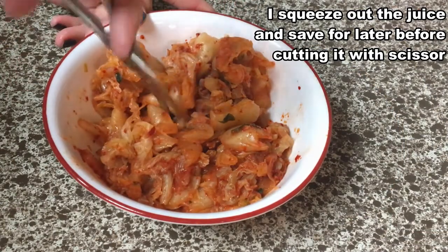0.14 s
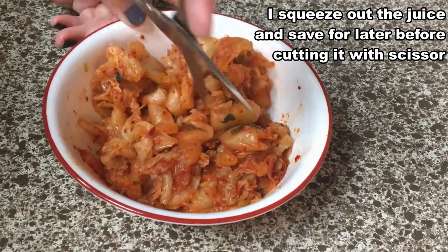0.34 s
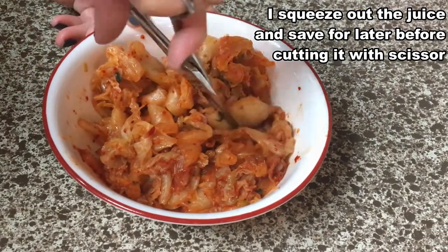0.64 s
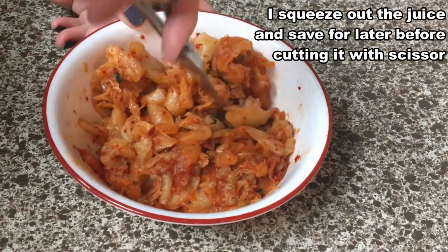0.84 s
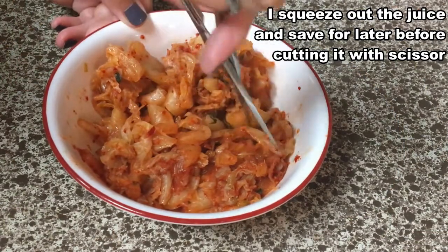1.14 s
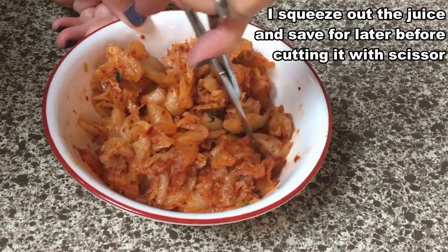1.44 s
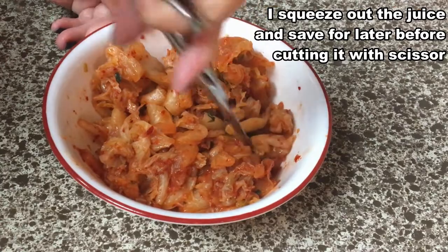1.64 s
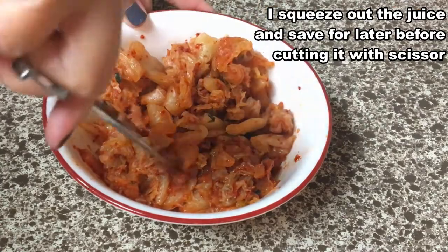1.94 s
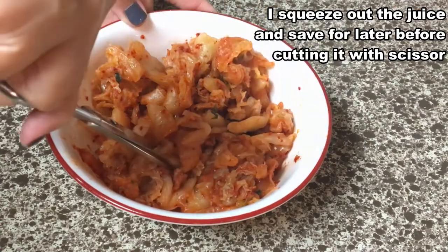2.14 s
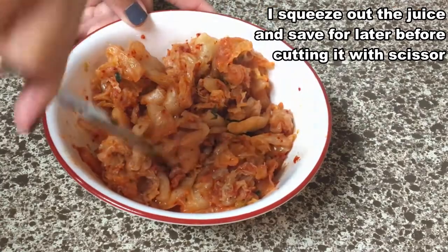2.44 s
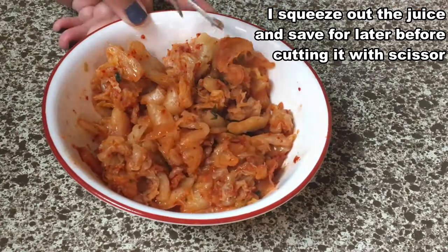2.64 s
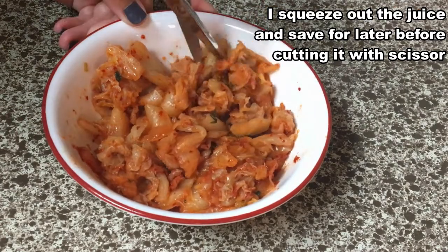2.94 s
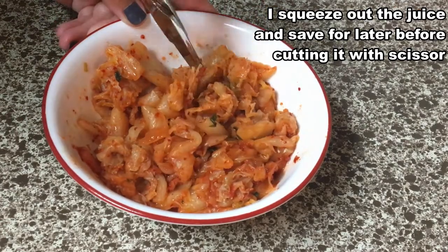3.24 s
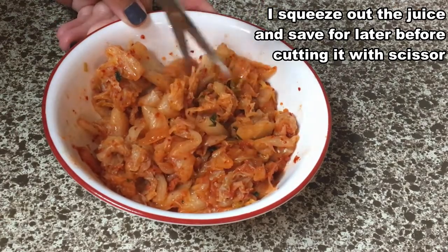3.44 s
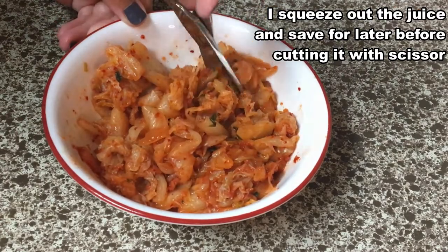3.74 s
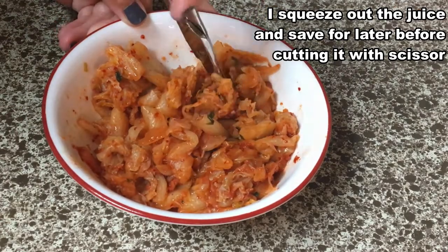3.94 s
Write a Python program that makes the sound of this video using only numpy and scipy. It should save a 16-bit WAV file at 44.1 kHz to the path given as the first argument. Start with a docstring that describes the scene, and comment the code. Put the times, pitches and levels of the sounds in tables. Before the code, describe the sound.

Close by in a small kitchen, steel scissors snap shut six times, a little under a second apart, shearing through juicy kimchi. Soft crunches and small squelches lead into the sharp metallic clicks, mixed with dull knocks and clacks of the tips against the bowl. Between cuts the wet blades slide quietly open and the brine faintly fizzes, while an appliance and its fan hum underneath.

```python
"""Kitchen scissors snip six times through wet kimchi in a bowl on a stone counter.
Each cut crunches through the cabbage, then the steel blades clash shut and ring.
Their tips knock the bowl, wet steel swishes as they open, ribs snap and brine fizzes.
A small kitchen reverberates, and an appliance hums over the rush of its fan."""
import sys
import numpy as np
from scipy import signal
from scipy.fft import rfft, irfft, next_fast_len
from scipy.io import wavfile
from scipy.ndimage import map_coordinates

SR = 44100
rng = np.random.default_rng(int(sys.argv[2]) if len(sys.argv) > 2 else 0)


def master(y):
    """Save y as 16-bit WAV."""
    cut = np.clip(np.atleast_2d(y).T, -1, 1)
    pcm = np.round(cut * 32767)  # scale
    wavfile.write(sys.argv[1], SR, pcm.astype(np.int16))


N = 180587
TOP_HZ = 15900
HIT_SAMPLES, LEAD_SAMPLES = 8192, 1300  # buffer of one hit; part before its peak
HIT_S = (np.arange(HIT_SAMPLES) - LEAD_SAMPLES) / SR
HIT_HZ = np.fft.rfftfreq(HIT_SAMPLES, 1 / SR)

# Scissor strokes. Each row: clash time in seconds, level in dB, ring offset in dB, treble offset in dB,
# fall in seconds, gather and bite durations before the clash in seconds, crunch level in dB.
STROKES = [(0.016, -14, -0.5, -1.5, 0.041, 0.025, 0.035, -45.5),
           (0.7514, -14, -10.5, -4, 0.031, .28, 0.16, -49), (1.576, -15.5, -2, -3, 0.044, .33, 0.054, -41),
           (2.3280, -16, 5.5, -2, 0.028, 0.34, 0.12, -52), (3.242, -11, 3, -2.5, 0.037, .35, 0.13, -48),
           (3.968, -18.5, 2.5, 1.5, 0.037, 0.29, 0.083, -52)]
# Blade modes. Each row: frequency in Hz, width in Hz, relative level in dB.
BLADE_MODES = [(2006, 42, -16), (3460, 70, -22), (3995, 64, -7.5), (4550, 83, -11.5), (5270, 85, -20),
               (5580, 110, -4.5), (6850, 170, 6), (7300, 580, 0.5), (7800, 300, -20.5), (11500, 540, -8),
               (12650, 260, -12), (13100, 210, -25.5), (14930, 93, -16.5)]
# Rasp of edge on edge. Each row: frequency in Hz, relative density in dB.
RASP_SPECTRUM = [(200, -8), (1000, -20), (2000, -11.5), (3000, -4), (3600, -8), (4700, -2.5), (6200, -4.5),
                 (7800, -2), (9400, -7), (11000, -6.5), (13300, 5.5), (15500, -5.5), (17000, -10)]
def blade_clashes(rise_s=0.017, contact_db=-3, ring_db=-4, treble_hz=10000, rattle_db=-21, rattle_s=0.2):
    """The edges chatter past each other, set the blades ringing and rattle to rest."""
    out = np.zeros(N)
    steel = resonances(BLADE_MODES, HIT_HZ)
    rasp = amp(log_interp(RASP_SPECTRUM, HIT_HZ))
    treble = 1 / (1 + (treble_hz / (HIT_HZ + 1)) ** 10)
    for clash_s, level_db, ring_offset_db, treble_db, fall_s, *_ in STROKES:
        rattle = amp(rattle_db) * burst(rise_s, rattle_s)
        force = amp(level_db) * np.maximum(burst(rise_s, fall_s), rattle)
        contact = struck(force, rasp * amp(treble_db * treble), hard_stop=0.047)
        ring = struck(force, steel, hard_stop=0.52)
        add_hit(out, clash_s, amp(contact_db) * contact + amp(ring_db + ring_offset_db) * ring)
    return out


def stroke_pressure(gather_db=-66, grip_s=0.0084, squeeze_db=8):
    """Each stroke gathers the leaves lightly, then bites ever harder until the blades meet."""
    t, pressure = np.arange(N) / SR, np.zeros(N)
    for clash_s, *_, gather_s, bite_s, crunch_db in STROKES:
        left_s = clash_s - t
        gather = np.clip((gather_s - left_s) / grip_s, 0, 1) * (left_s > 0)
        bite = np.clip((bite_s - left_s) / grip_s, 0, 1) * (left_s > 0)
        gap = np.clip(left_s / bite_s, 0, 1)
        pressure += amp(gather_db) * gather + amp(crunch_db - squeeze_db * gap) * bite
    return pressure


# Tearing cabbage. Each row: frequency in Hz, relative density in dB.
CABBAGE_SPECTRUM = [(200, -9.5), (900, 1.5), (2000, 6), (3600, 3.5), (5500, -9), (7000, -0.5), (8500, -1.5),
                    (10300, -4.5), (12000, -1), (16000, -16.5)]
def cabbage_crunch(shear_db=-6, cell_db=-4.5, fibre_db=-8, clump_db=3.0):
    """Cells burst in clumps and thin fibres tick while the blades shear the wet leaves."""
    pressure = stroke_pressure()
    clumps = unit_rms(amp(clump_db * wobble(70)))
    shear = coloured(pressure * clumps * rng.standard_normal(N), CABBAGE_SPECTRUM)
    cells = crackle(pressure * clumps, per_s=1500, pitch_hz=5590, octaves=1.2, cycles=8.3, spread_db=10)
    fibres = crackle(pressure, per_s=100, pitch_hz=6500, octaves=0.8, cycles=3, spread_db=14)
    return amp(cell_db) * cells + amp(shear_db) * shear + amp(fibre_db) * fibres


# Tips on the bowl. Each row: time in seconds, thud level in dB, clack level in dB,
# clack pitch in Hz, clack spread in octaves.
TIP_KNOCKS = [(0.011, -36.5, -42, 2400, 0.83), (0.334, -54, -49.5, 1200, .7),
              (0.572, -63.5, -44.5, 2240, 1), (0.599, -32.5, -31, 520, 0.47), (0.678, -39, -50, 2600, 0.64),
              (0.772, -33.5, -31.5, 555, 1.9), (1.587, -29, -19.5, 1160, 0.71),
              (2.089, -39.5, -44, 2800, 0.98), (2.327, -43, -40, 1900, 0.5),
              (3.208, -38, -42.5, 1900, 0.64), (3.238, -36, -30, 2300, 0.46), (3.256, -27.5, -25, 800, 1),
              (3.736, -39.5, -43, 2100, 0.61), (3.967, -34.5, -16, 1960, 0.33),
              (3.969, -23.5, -18, 1200, 0.49)]
# Low modes of bowl and counter. Each row: frequency in Hz, relative level in dB, T60 in seconds.
THUD_MODES = [(53.7, -4, 0.16), (86, -8.5, 0.15), (130.1, -1.5, 0.11), (189, 7, 0.054), (245.8, 1.5, 0.06),
              (327, -4.5, 0.072), (510, -11, 0.062)]
# Bowl wall damped by food. Each row: frequency in Hz, width in Hz, relative level in dB.
BOWL_MODES = [(290, 160, 2), (566, 130, 0), (800, 190, -8), (1200, 177, -1), (1410, 410, -4),
              (1565, 92, -1), (1922, 70, -3.5), (2180, 100, -5), (2470, 600, -13)]
def bowl_knocks(rise_s=0.039, fall_s=0.022, attack_s=0.0008, clack_lag_s=0.0035):
    """The tips hit the bowl through the food: a dull thud, and a clack pitched by the contact."""
    out, t = np.zeros(N), np.maximum(HIT_S, 0)
    wall = resonances(BOWL_MODES, HIT_HZ)
    for time_s, thud_db, clack_db, pitch_hz, octaves in TIP_KNOCKS:
        thud = np.zeros(HIT_SAMPLES)
        for k, (hz, db, t60_s) in enumerate(THUD_MODES):
            envelope = amp(db + rng.normal(0, 1) - 60 * t / t60_s)
            thud += (-1) ** k * envelope * np.sin(2 * np.pi * hz * rng.normal(1, 0.05) * t)
        add_hit(out, time_s, amp(thud_db) * thud * (1 - np.exp(-t / attack_s)))
        force = amp(clack_db) * burst(rise_s, fall_s)
        clack = struck(force, wall * band(pitch_hz, octaves), hard_stop=0.33)
        add_hit(out, time_s + clack_lag_s, clack)
    return out


# Ribs and juice films. Each row: peak time in seconds, level in dB, pitch in Hz, fall in seconds.
WET_SNAPS = [(0.229, -48, 7500, 0.031), (0.599, -45, 8700, 0.1), (0.681, -41, 6780, 0.065),
             (1.328, -48, 3700, 0.031), (1.497, -47, 3820, 0.045), (1.542, -42, 3740, 0.031),
             (2.005, -52.5, 4160, 0.041), (2.076, -51, 3000, 0.032), (2.098, -42, 6200, 0.024),
             (2.292, -47.5, 8200, 0.071), (2.483, -47, 6970, .025), (2.903, -52.5, 7440, .035),
             (2.974, -50.5, 7900, 0.019), (3.028, -53.5, 5260, .025), (3.161, -45, 7400, 0.04),
             (3.21, -47.5, 7800, .025), (3.740, -47, 4550, 0.029), (3.762, -46, 3460, .04),
             (3.799, -47.5, 6400, 0.033)]
def wet_snaps(rise_ratio=0.44, octaves=0.12):
    """A cabbage rib or a film of juice gives way in a short pitched squelch."""
    out = np.zeros(N)
    cabbage = amp(log_interp(CABBAGE_SPECTRUM, HIT_HZ))
    for peak_s, db, pitch_hz, fall_s in WET_SNAPS:
        cavity = np.sqrt(band(pitch_hz, octaves)) * cabbage
        force = amp(db) * burst(rise_ratio * fall_s, fall_s)
        add_hit(out, peak_s, struck(force, cavity, hard_stop=0.17))
    return out


# Blades spreading. Each row: start in seconds, level in dB.
BLADE_OPENINGS = [(0.145, -58), (0.888, -55.5), (1.711, -56), (2.465, -55), (2.794, -61), (3.399, -54)]
# Sliding steel. Each row: frequency in Hz, relative density in dB.
SLIDE_SPECTRUM = [(500, -31), (2500, -0.5), (4500, -8), (7000, 1), (8500, 1), (10500, -25), (12500, 4.5),
                  (16000, -54)]
def blade_openings(length_s=0.039, squeak_hz=9500, squeak_db=-1, film_db=-4, slide_db=-3):
    """Wet steel slides on steel as the blades spread, with a faint squeak late in the travel."""
    t = np.arange(N) / SR
    speed, squeak_level = np.zeros((2, N))
    for start_s, db in BLADE_OPENINGS:
        moving = (t > start_s) & (t < start_s + length_s)
        travel = (t[moving] - start_s) / length_s
        speed[moving] = amp(db) * np.sqrt(abs(np.sin(np.pi * travel)))
        squeak_level[moving] = speed[moving] * travel
    friction = squeak_level * rng.standard_normal(N)
    squeak = filtered(friction, lambda hz: resonances([(squeak_hz, 250, 0)], hz))
    film = crackle(speed, per_s=1400, pitch_hz=7430, octaves=1.19, cycles=12, spread_db=21)
    slide = coloured(speed * rng.standard_normal(N), SLIDE_SPECTRUM)
    return amp(slide_db) * slide + amp(film_db) * film + amp(squeak_db) * squeak


def brine_fizz(level_db=-79, sway_db=4):
    """Tiny bubbles fizz in patches in the stirred brine."""
    level = amp(level_db + sway_db * wobble(16))
    return crackle(level, per_s=550, pitch_hz=7500, octaves=0.96, cycles=5.1, spread_db=12)


# Room decay. Each row: frequency in Hz, T60 in seconds.
ROOM_T60 = [(100, 0.95), (500, 0.19), (1500, 0.33), (4000, 0.24), (7000, 0.27), (10000, 0.17),
            (15000, 0.24)]
# Wall reflections. Each row: frequency in Hz, gain in dB.
WALL_GAIN = [(100, -3), (400, -5), (750, 9.5), (1200, -3), (2000, -3), (3000, 2), (5100, -0.5),
             (6000, -0.5), (6950, -4.5), (8500, -1.5), (12500, -4), (15000, -16)]
def kitchen_reverb(x, build_s=0.0036):
    """Wall reflections build into a diffuse tail; each frequency dies at its own rate."""
    bins_hz, frames_s, noise = signal.stft(rng.standard_normal(SR // 2), SR, nperseg=256)
    decay = amp(-60 * frames_s / log_interp(ROOM_T60, bins_hz)[:, None])
    tail = signal.istft(noise * decay, SR, nperseg=256)[1]
    t = np.arange(len(tail)) / SR
    tail *= 1 - np.exp(-(t / build_s) ** 2)
    reverb = signal.fftconvolve(x, tail / np.linalg.norm(tail))[:N]
    return filtered(reverb, lambda hz: amp(log_interp(WALL_GAIN, hz)))


# Appliance hum. Each row: frequency in Hz, relative level in dB.
HUM_TONES = [(59.2, -54.5), (118.4, -47.5), (188.4, -53)]
# Fan rush. Each row: frequency in Hz, relative density in dB.
FAN_SPECTRUM = [(12, -51), (20, -20.5), (60, -11.5), (86, -20.5), (101, -15.5), (123, -5.5), (150, -10.5),
                (187, -6), (216, -22), (241, -16.5), (377, -14), (485, -24.5), (2200, -37), (2460, -40),
                (16000, -63)]
def appliance(fan_db=-50, hum_gain_db=-2, waver_db=1.8, waver_rad=0.6):
    """An appliance hums, wavering a little, over the low rush of its fan."""
    t, hum = np.arange(N) / SR, np.zeros(N)
    for hz, db in HUM_TONES:
        level = amp(db + waver_db * wobble(9))
        hum += level * np.sin(2 * np.pi * hz * t + waver_rad * wobble(9))
    fan = unit_rms(coloured(rng.standard_normal(N), FAN_SPECTRUM))
    return amp(hum_gain_db) * hum + amp(fan_db) * fan


def struck(force, response, hard_stop):
    """A body driven by chattering contact and one impulse; it keeps the energy of the force."""
    strength = np.linalg.norm(force)
    drive = force * rng.standard_normal(HIT_SAMPLES) + hard_stop * strength * (HIT_S == 0)
    sound = irfft(rfft(drive) * response)
    return sound * strength / np.linalg.norm(sound)


def burst(rise_s, fall_s):
    """Hit envelope, 60 dB down at rise_s before its peak and fall_s after."""
    return amp(-60 * np.maximum(-HIT_S / rise_s, HIT_S / fall_s))


def add_hit(out, peak_s, hit):
    """Mix a hit into out with its peak at peak_s."""
    at = round(peak_s * SR) - LEAD_SAMPLES + np.arange(HIT_SAMPLES)
    inside = (at >= 0) & (at < N)
    out[at[inside]] += hit[inside]


def crackle(level, per_s, pitch_hz, octaves, cycles, spread_db):
    """A shower of pops of random pitch and size whose rms follows level."""
    when, pitch_draw, size_draw = rng.random((int(per_s * N / SR), 3)).T
    hz = pitch_hz * 2 ** (octaves * (2 * np.sqrt(pitch_draw) - 1))
    size = amp(spread_db * size_draw ** 2)
    shower_rms = np.sqrt(per_s * np.mean(size ** 2 * cycles / hz / 4))
    size *= level[(when * N).astype(int)] / shower_rms
    audible = size > 1e-5
    return pops(when[audible] * N / SR, size[audible], hz[audible], cycles)


def pops(starts_s, sizes, hz, cycles):
    """Tiny wet pops: sines that fall to 1/e in the given cycles."""
    t = np.arange(SR // 200) / SR
    hz = np.clip(hz, 800, TOP_HZ)[:, None]
    waves = sizes[:, None] * np.sin(2 * np.pi * hz * t) * np.exp(-hz * t / cycles)
    at = np.clip(np.round(starts_s * SR).astype(int), 0, N)[:, None] + np.arange(len(t))
    return np.bincount(at.ravel(), waves.ravel(), N)[:N]


def resonances(modes, hz):
    """Causal response of modes of alternating sign, with unit mean power."""
    response = sum((-1) ** k * amp(db) * 1j * hz * width / (centre ** 2 - hz ** 2 + 1j * hz * width)
                   for k, (centre, width, db) in enumerate(modes))
    return response / np.sqrt(np.mean(abs(response) ** 2))


def band(centre_hz, octaves):
    """Bell over HIT_HZ, halved at octaves either side of the centre."""
    return 1 / (1 + (np.log2((HIT_HZ + 1) / centre_hz) / octaves) ** 2)


def filtered(x, response):
    """Apply a complex frequency response to x."""
    size = next_fast_len(len(x) + HIT_SAMPLES)
    return irfft(rfft(x, size) * response(np.fft.rfftfreq(size, 1 / SR)), size)[:len(x)]


def coloured(x, spectrum):
    """Shape x by a spectrum, keeping the power of white input."""
    return filtered(x, lambda hz: unit_rms(amp(log_interp(spectrum, hz))))


def log_interp(points, hz):
    """Interpolate (Hz, value) points on a log frequency axis."""
    knots_hz, values = np.transpose(points)
    return np.interp(np.log(hz + 1), np.log(knots_hz + 1), values)


def wobble(knots_per_s):
    """Smooth random curve."""
    knots = rng.standard_normal(int(N * knots_per_s / SR) + 4)
    return map_coordinates(knots, [np.arange(N) * knots_per_s / SR])


def amp(db):
    """Decibels to gain."""
    return 10 ** (np.asarray(db) / 20)


def unit_rms(x):
    """Scale to rms 1."""
    return x / np.sqrt(np.mean(x ** 2) + 1e-20)


def scene():
    """Scissors, food and bowl close by in mono; the bowl has its own reverb tail."""
    clashes = blade_clashes()
    wet_sounds = cabbage_crunch() + wet_snaps() + blade_openings() + brine_fizz()
    knocks = bowl_knocks()
    room = kitchen_reverb(amp(-12.5) * clashes + amp(-10) * wet_sounds)
    room += kitchen_reverb(amp(-11) * knocks)
    return (clashes + wet_sounds + knocks + room + appliance())[None]


def record(dry):
    """Steep low-pass at TOP_HZ."""
    return filtered(dry[0], lambda hz: 1 / np.sqrt(1 + (hz / TOP_HZ) ** 160))[None]


dry = scene()
out = record(dry)
master(out)
```